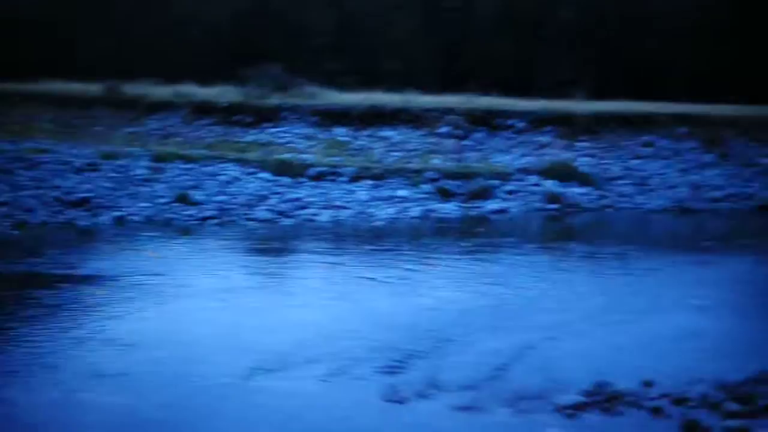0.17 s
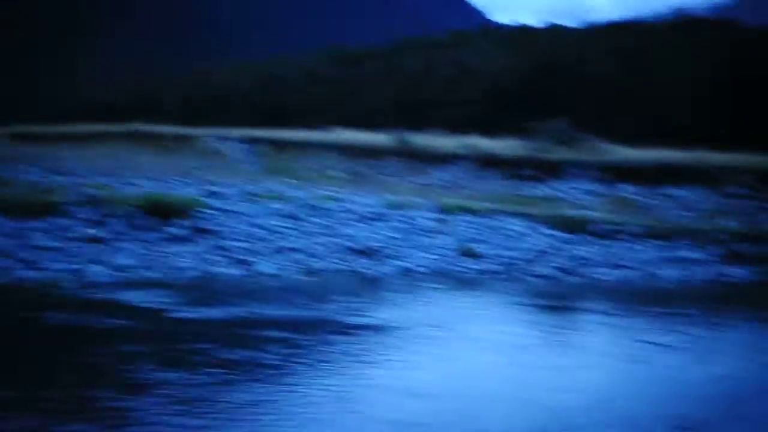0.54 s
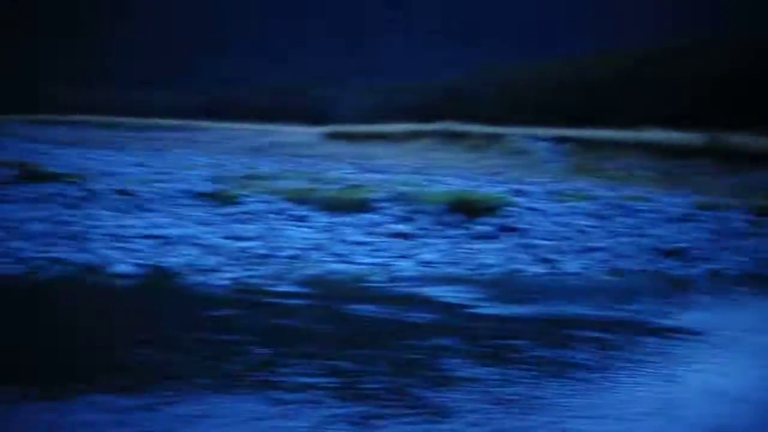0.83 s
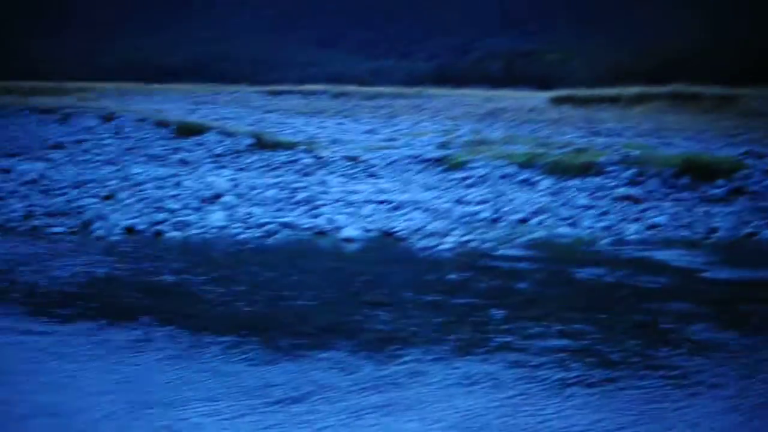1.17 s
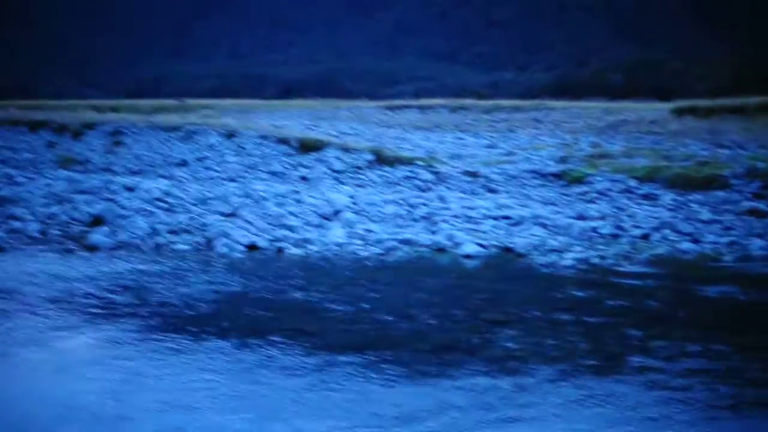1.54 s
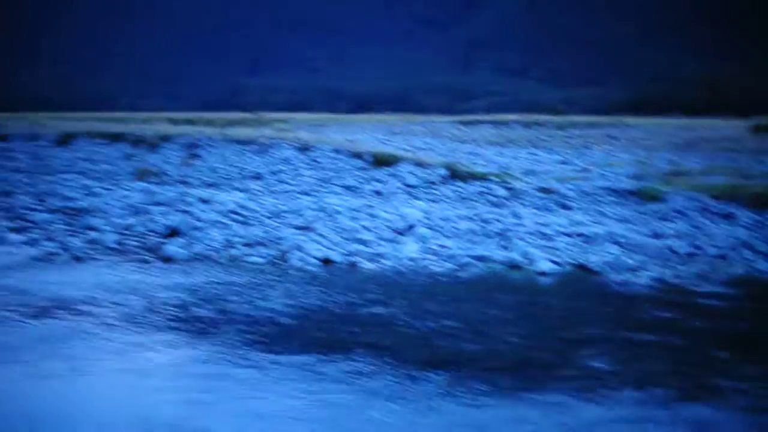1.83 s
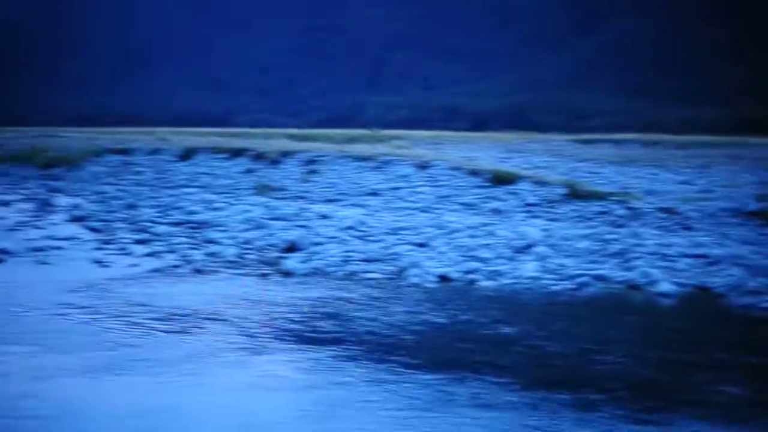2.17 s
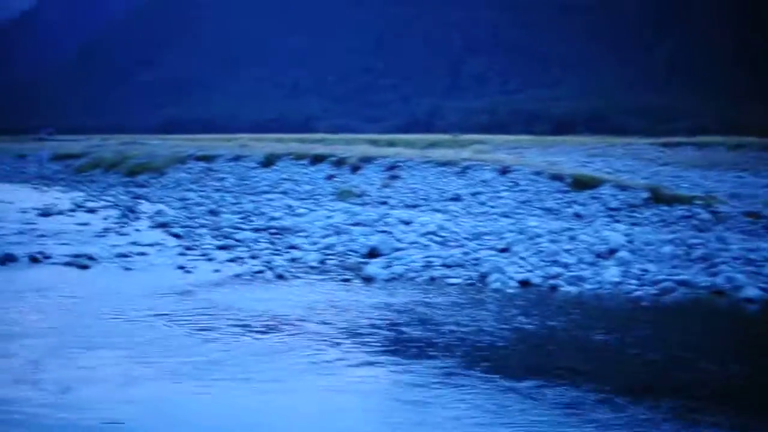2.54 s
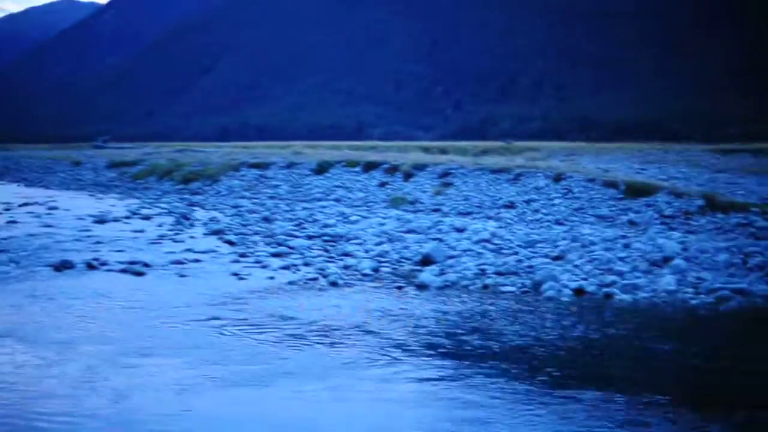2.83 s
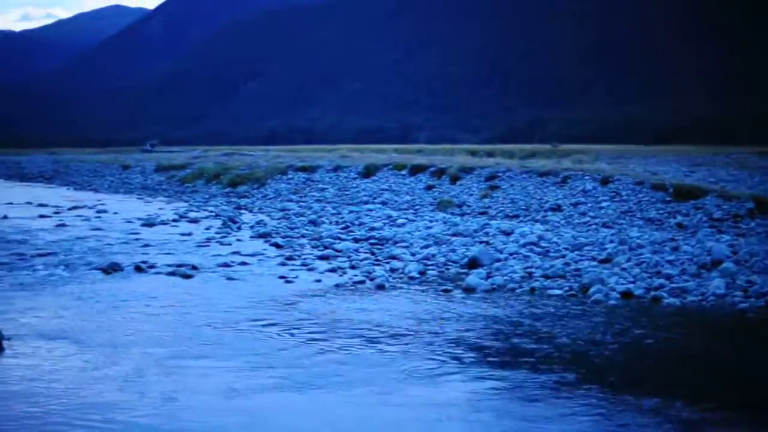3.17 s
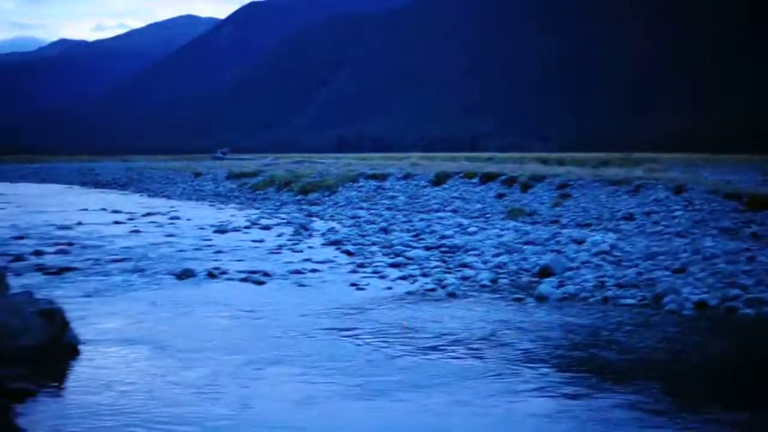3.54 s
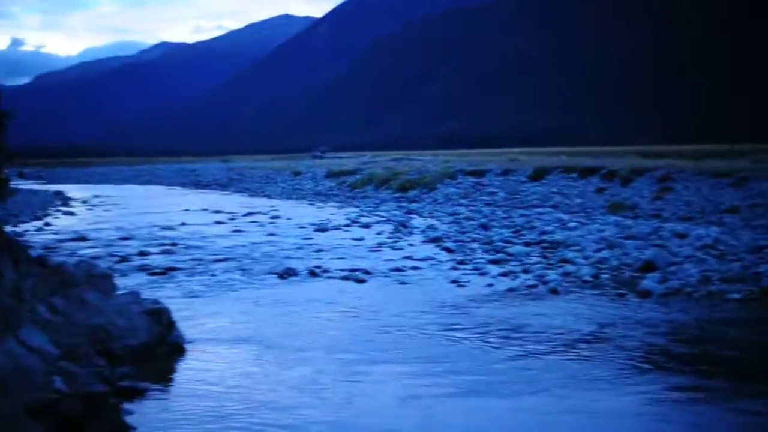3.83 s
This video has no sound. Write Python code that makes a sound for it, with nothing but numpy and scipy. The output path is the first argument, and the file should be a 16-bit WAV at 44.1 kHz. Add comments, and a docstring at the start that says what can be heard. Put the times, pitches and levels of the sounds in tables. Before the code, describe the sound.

A shallow river washes steadily over stones outdoors, flecked with tiny bubbles. Close clothing rustles and ticks in the first second and a half, while low puffs of air bump the handheld microphone, hardest at the end.

```python
"""A shallow river rushes over stones: a steady wash of coloured noise whose parts slowly grow and fade.
Small bubbles fleck it, each a short ring that rises in pitch. Air buffets the microphone: a light draught
and low puffs of filtered noise, and single thumps made as brief swings of pressure. For about the first
second and a half, clothing close by rustles (grainy, crackling noise) and ticks (tiny bursts of noise)."""
import sys
import numpy as np
from scipy import signal
from scipy.fft import rfft, irfft
from scipy.io import wavfile
from scipy.ndimage import uniform_filter1d

SR = 44100
rng = np.random.default_rng(int(sys.argv[2]) if len(sys.argv) > 2 else 0)


def dump(signal):
    """Clip the signal to [-1, 1] and save it as 16-bit WAV at the path in sys.argv[1]."""
    limited = np.clip(np.atleast_2d(signal).T, -1, 1)
    pcm = np.round(limited * 32767).astype(np.int16)
    wavfile.write(sys.argv[1], SR, pcm)


N = 176400  # samples: 4 seconds

# Tone colour of the river. Each row: frequency in Hz, relative level in dB per Hz.
WASH_COLOUR = [(30, 13), (150, -6), (250, -0.5), (370, -4), (600, 3), (790, -0.5), (980, 2.5), (1200, 1.5),
               (1420, 1.5), (1650, -1.5), (2150, -1.5), (3200, -8), (4400, -9), (6200, -11.5),
               (7200, -15.5), (8500, -15.5), (10000, -26), (12500, -38.5), (15500, -46)]
# Light draught over time. Each row: time in seconds, level in dB.
DRAUGHT_LEVEL = [(0, -31), (.45, -32.5), (.62, -44.5), (.9, -42), (1.1, -44), (1.45, -29), (1.6, -54),
                 (1.85, -46.5), (2.02, -34), (2.15, -48), (2.5, -36), (2.7, -42.5), (2.88, -32),
                 (3.02, -37), (3.45, -33), (3.75, -26.5), (4, -36)]
# Tone colour of the draught. Each row: frequency in Hz, relative level in dB per Hz.
DRAUGHT_TONE = [(15, -17), (30, -5), (55, -1.5), (110, -5.5), (200, -15), (400, -25), (1000, -71),
                (4000, -90)]
# Puffs of air on the microphone. Each row: start in seconds, length in seconds, level in dB,
# and the frequency in Hz above which the puff gets duller.
AIR_PUFFS = [(0.0, 0.039, -32, 1210), (0.04, .10, -32.5, 220), (0.127, 0.08, -28, 240),
             (0.22, 0.22, -33, 222), (0.407, 0.025, -25.5, 710), (0.433, .10, -35, 201),
             (0.702, 0.15, -31.5, 280), (0.832, 0.1, -25.5, 274), (1.15, 0.132, -32.5, 240),
             (1.287, 0.1, -27.5, 437), (1.385, 0.062, -26.5, 274), (1.47, 0.019, -21.5, 336),
             (1.859, .18, -33, 200), (1.888, 0.09, -23.5, 306), (2.778, .14, -40, 193),
             (3.658, .34, -24.5, 250), (3.708, 0.047, -17.5, 320), (3.76, 0.1, -21.5, 337),
             (3.868, 0.045, -21, 343)]
# Strokes of cloth. Each row: start in seconds, length in seconds, level in dB.
CLOTH_STROKES = [(0, 0.49, -45.5), (0.045, 0.072, -38.5), (0.244, 0.012, -46), (0.417, 0.032, -39),
                 (0.469, 0.05, -41), (1.035, 0.39, -51.5), (1.067, 0.033, -43), (1.226, 0.05, -43.5)]
# Tone colour of the cloth. Each row: frequency in Hz, relative level in dB per Hz.
CLOTH_COLOUR = [(100, -22), (500, -7), (850, 14), (1800, 2), (3200, 5), (4700, 0), (6500, 5), (9000, 1.5),
                (10500, -8.5), (12500, -18), (15500, -32)]
# Thumps on the microphone. Each row: middle in seconds, peak level in dB, pitch in Hz.
AIR_THUMPS = [(.0307, -12.5, 774), (0.055, -18.5, 172), (.421, -18.5, 635), (.874, -17, 224),
              (1.187, -21, 225), (1.305, -17.5, 196), (1.9108, -31, 159), (1.923, -10, 182),
              (1.956, -17, 397), (1.97, -18, 480), (3.593, -14, 251), (3.668, -6, 480), (3.727, -5, 220),
              (3.835, -14, 414), (3.926, -14.5, 252), (3.991, -12.5, 230)]
# Ticks of snagging cloth. Each row: start in seconds, level in dB before the fade,
# centre frequency in Hz, fade time in seconds.
CLOTH_TICKS = [(.095, -29, 7500, 0.0027), (.107, -28.5, 7050, 0.0024), (.139, -30, 5870, 0.0025),
               (.215, -29.5, 7500, 0.0012), (0.233, -21.5, 3770, 0.0012), (.245, -21.5, 6000, 0.0012),
               (0.294, -33, 7250, 0.0014), (0.3251, -14, 9150, 0.0013), (.333, -33, 8000, .003),
               (0.354, -23, 8700, 0.0032), (.394, -32, 7000, 0.0015), (.4405, -23, 12900, 0.0013),
               (.587, -36, 12000, 0.00077), (.605, -30.5, 9600, 0.00072), (1.023, -31, 1760, .002),
               (1.129, -26, 5940, 0.0023), (1.226, -23.5, 1560, 0.0009), (1.285, -35, 13000, 0.0007),
               (1.325, -29.5, 7000, 0.0019), (1.348, -40, 13000, 0.00067), (1.359, -29, 6500, 0.0014),
               (1.477, -30.5, 9350, 0.001), (1.564, -41, 11000, 0.00087)]
# Broad sound shared by all ticks. Each row: frequency in Hz, level in dB against a tick's own peak.
TICK_BROAD = [(200, -28), (1700, -18), (3100, -1.5), (4500, -11), (7000, -14), (15000, -13)]

WASH_DB = -38
WASH_PATCH_DB, WASH_FLICKER_DB, WASH_SWELL_DB = 1.1, 0.5, 0.58  # typical size of each change

BUBBLE_DB, BUBBLES_PER_S = -47, 200
BUBBLE_LOW_HZ, BUBBLE_HIGH_HZ = 557.5, 2400
BUBBLE_CYCLES = 10  # fade time, in cycles of the starting pitch
BUBBLE_RISE = 0.049  # share by which the pitch climbs in one fade time
BUBBLE_SPREAD_DB = 3

PUFF_ATTACK_S, PUFF_RELEASE_S = 0.0069, 0.046
PUFF_LOW_HZ = 77  # a puff gets weaker below this
PUFF_SLOPE = 2.82  # power of frequency by which a puff falls off at the top
PUFF_LUMP_DB = 3

CLOTH_ATTACK_S, CLOTH_RELEASE_S = 0.0044, 0.0072
CLOTH_GRAIN_DB = 4
CRACKLES_PER_S, CRACKLE_SPREAD_DB = 610, 4.5
CRACKLE_SHARE_DB = -1  # crackle against the smoother rub

THUMP_CYCLES = 0.37  # width of the bell-shaped swell, in cycles

TICK_WIDTH_OCT = 0.32  # width of the peak, in octaves
TICK_TOP_HZ, TICK_TOP_SLOPE = 9440, 11.5  # steep fall above this frequency, as a power of it
TICK_RISE_S = 0.0003

EDGE_HZ = 15830  # top of the recorder's range


def amp(db):
    """Turns decibels into a plain gain."""
    return 10 ** (np.asarray(db) / 20)


def unit(x):
    """Scales a signal to an average strength (rms) of 1."""
    return x / np.sqrt(np.mean(x ** 2) + 1e-20)


def read(points, hz):
    """Reads a table of levels, with frequency on a log scale."""
    f, value = np.transpose(points)
    return np.interp(np.log(hz + 1), np.log(f), value)


def add(mix, s, sound):
    """Mixes a sound in at time s, cut off where the mix ends."""
    part = mix[max(round(s * SR), 0):][:len(sound)]
    part += sound[:len(part)]


def shaped(x, gain):
    """Filters x by a gain that depends on frequency, then scales it to rms 1."""
    hz = np.fft.rfftfreq(len(x), 1 / SR)
    return unit(irfft(rfft(x) * gain(hz), len(x)))


def wander(rate_hz):
    """Smooth random drift of rms 1, with little movement faster than the given rate."""
    return shaped(rng.standard_normal(N), lambda f: np.exp(-(f / rate_hz) ** 2))


def gate(start, length, attack, release):
    """Fades in, holds and fades out, reaching half height at the end of the length."""
    t = np.arange(N) / SR - start
    return np.clip(t / attack, 0, 1) * np.clip((length - t) / release + .5, 0, 1)


def wash():
    """Water rushing over stones: noise with drifting patches, a slight flicker and a slow swell."""
    hz = np.fft.rfftfreq(1024, 1 / SR)
    frames = N // 256 + 5
    real, imaginary, rough = rng.standard_normal((3, frames, len(hz)))
    # smoothing over time, then over frequency, turns single random values into patches
    over_time = uniform_filter1d(rough, size=7, axis=0)
    patches = unit(uniform_filter1d(over_time, size=7, axis=1))
    gain = amp(read(WASH_COLOUR, hz) + WASH_PATCH_DB * patches)
    spectrum = (real + 1j * imaginary) * gain
    water = signal.istft(spectrum.T, nperseg=1024, noverlap=768)[1][:N]
    flicker = WASH_FLICKER_DB * wander(rate_hz=120)
    swell = WASH_SWELL_DB * wander(rate_hz=2.5)
    return amp(WASH_DB) * unit(water * amp(flicker + swell))


def bubbles(count=32):
    """Many small bubbles: each rings at one of several pitches, which rises as the ring dies away."""
    out, t = np.zeros(N), np.arange(SR // 10) / SR
    for hz in np.geomspace(BUBBLE_LOW_HZ, BUBBLE_HIGH_HZ, count):
        age = t * hz / BUBBLE_CYCLES  # in fade times
        swell_and_fade = (1 - np.exp(-6 * age)) * np.exp(-age)
        ring = swell_and_fade * np.sin(2 * np.pi * hz * t * (1 + BUBBLE_RISE * age / 2))
        sizes = amp(BUBBLE_SPREAD_DB * np.minimum(rng.exponential(1, N), 3.5))
        starts = rng.random(N) < BUBBLES_PER_S / count / SR
        out += signal.oaconvolve(sizes * starts, ring)[:N]
    return amp(BUBBLE_DB) * unit(out)


def draught():
    """Light moving air on the microphone: low noise whose level follows a table."""
    noise = shaped(rng.standard_normal(N), lambda f: amp(read(DRAUGHT_TONE, f)))
    return noise * amp(np.interp(np.arange(N) / SR, *np.transpose(DRAUGHT_LEVEL)))


def puffs():
    """Puffs of air on the microphone: bursts of low noise with an uneven, lumpy level."""
    out = np.zeros(N)
    lumps = amp(PUFF_LUMP_DB * wander(rate_hz=60))
    for start, length, db, top_hz in AIR_PUFFS:
        def colour(f):
            low_cut = f / np.hypot(f, PUFF_LOW_HZ)
            return low_cut / np.hypot(1, (f / top_hz) ** PUFF_SLOPE)
        eddies = shaped(rng.standard_normal(N), colour)
        push = gate(start, length, PUFF_ATTACK_S, PUFF_RELEASE_S)
        # the last factor keeps the listed level true for short and long puffs alike
        out += amp(db) * unit(eddies * lumps * push) * np.sqrt(np.mean(push ** 2))
    return out


def rustles():
    """Strokes of fabric: a grainy rub of noise mixed with random crackles."""
    rub = unit(rng.standard_normal(N) * amp(CLOTH_GRAIN_DB * wander(rate_hz=430)))
    sizes = amp(CRACKLE_SPREAD_DB * np.minimum(rng.exponential(1, N), 3))
    starts = rng.random(N) < CRACKLES_PER_S / SR
    crackle = unit(rng.choice([-1, 1], N) * sizes * starts)
    mixed = rub + amp(CRACKLE_SHARE_DB) * crackle
    grains = shaped(mixed, lambda f: amp(read(CLOTH_COLOUR, f)))
    strokes = np.zeros(N)
    for start, length, db in CLOTH_STROKES:
        strokes += amp(db) * gate(start, length, CLOTH_ATTACK_S, CLOTH_RELEASE_S)
    return grains * strokes


def thumps():
    """Single knocks of air on the microphone: about one swing of pressure under a bell-shaped swell."""
    out = np.zeros(N)
    for middle, db, hz in AIR_THUMPS:
        cycles = (np.arange(N) / SR - middle) * hz
        bell = np.exp(-.5 * (cycles / THUMP_CYCLES) ** 2)
        out += amp(db) * bell * np.cos(2 * np.pi * (cycles + rng.random()))
    return out


def ticks():
    """Cloth snagging: sharp bursts of noise, strongest around one frequency, that die away at once."""
    out, t = np.zeros(N), np.arange(SR // 20) / SR
    for start, db, hz, decay in CLOTH_TICKS:
        def colour(f):
            peak = np.exp(-.5 * (np.log2((f + 1) / hz) / TICK_WIDTH_OCT) ** 2)
            body = amp(read(TICK_BROAD, f))
            return (body + peak) / np.hypot(1, (f / TICK_TOP_HZ) ** TICK_TOP_SLOPE)
        noise = shaped(rng.standard_normal(len(t)), colour)
        fade = np.minimum(t / TICK_RISE_S, 1) * np.exp(-t / decay)
        add(out, start, amp(db) * noise * fade)
    return out


def scene():
    """Adds the river, the air on the microphone and the cloth into one channel."""
    river = wash() + bubbles()
    air = draught() + puffs() + thumps()
    cloth = rustles() + ticks()
    return (river + air + cloth)[None]


def record(dry):
    """The recorder's upper limit: a filter removes what lies above the edge frequency."""
    low_pass = signal.firwin(511, EDGE_HZ, window=("kaiser", 9), fs=SR)
    return signal.oaconvolve(dry, low_pass[None], "same")


dry = scene()
out = record(dry)
dump(out)
```